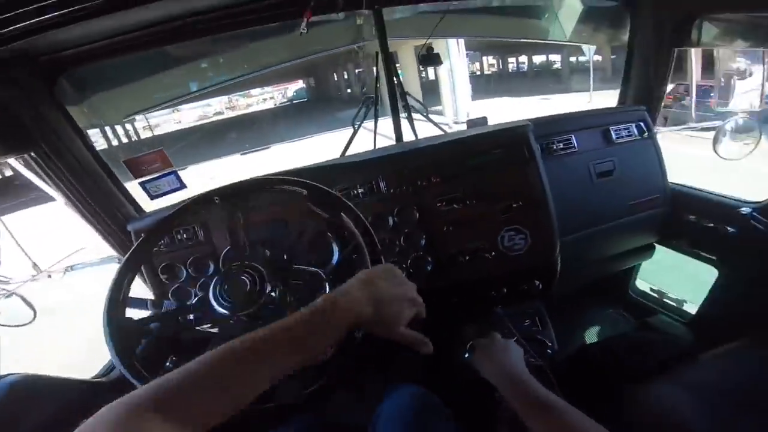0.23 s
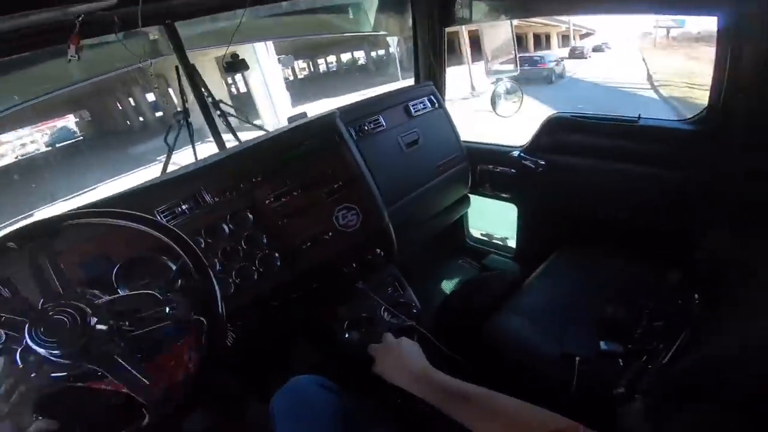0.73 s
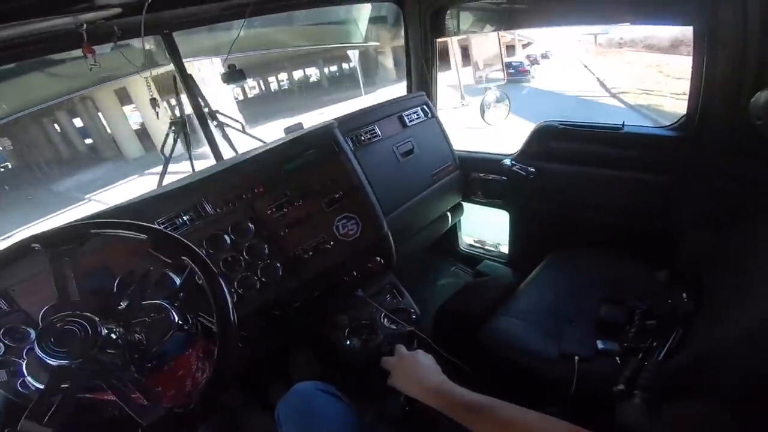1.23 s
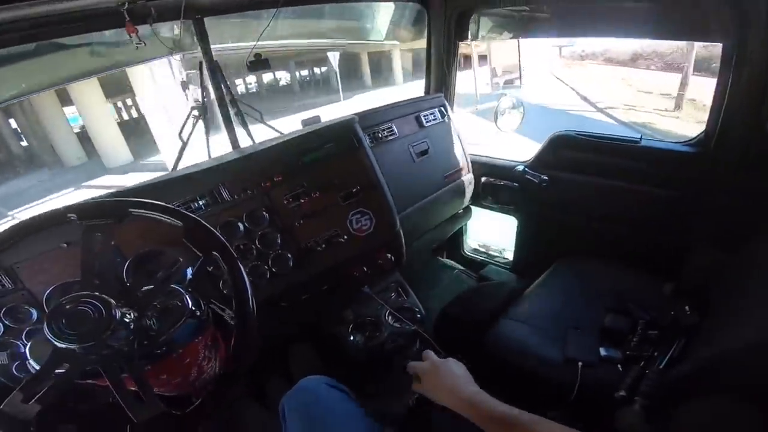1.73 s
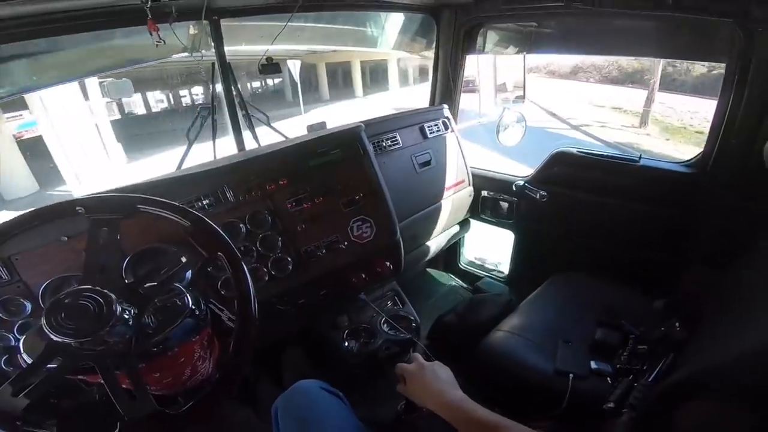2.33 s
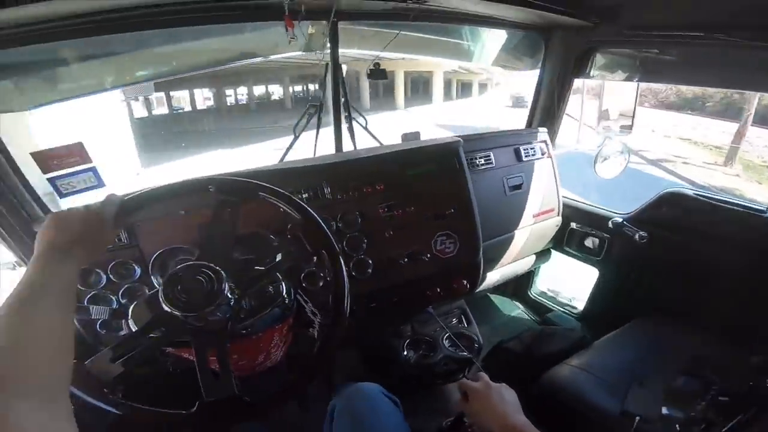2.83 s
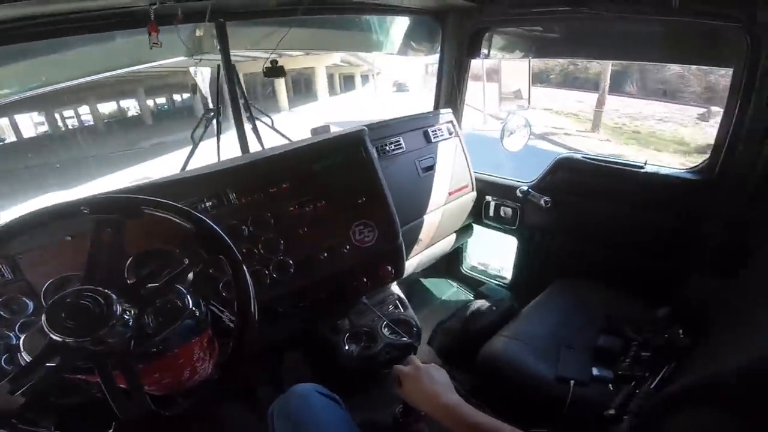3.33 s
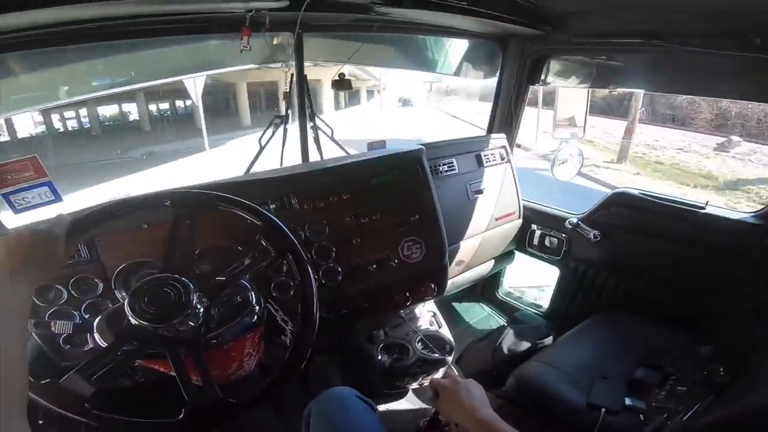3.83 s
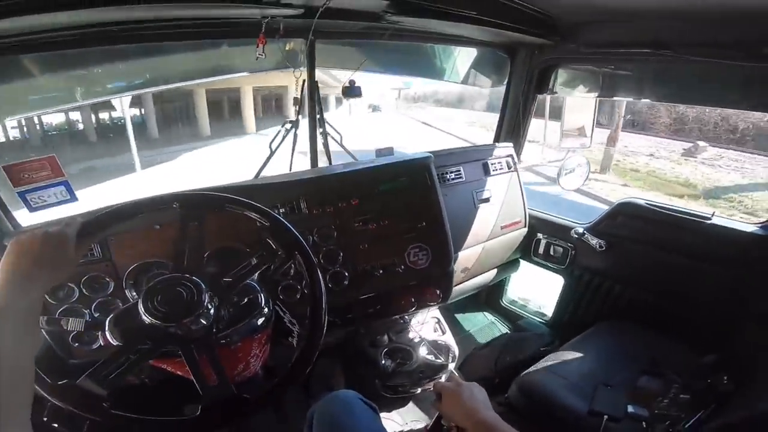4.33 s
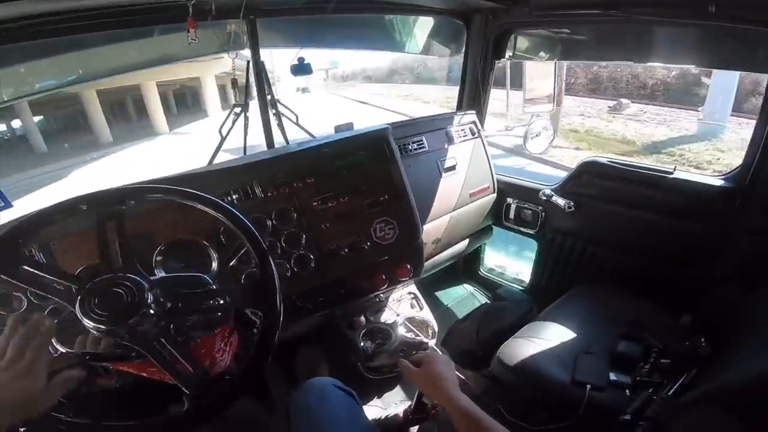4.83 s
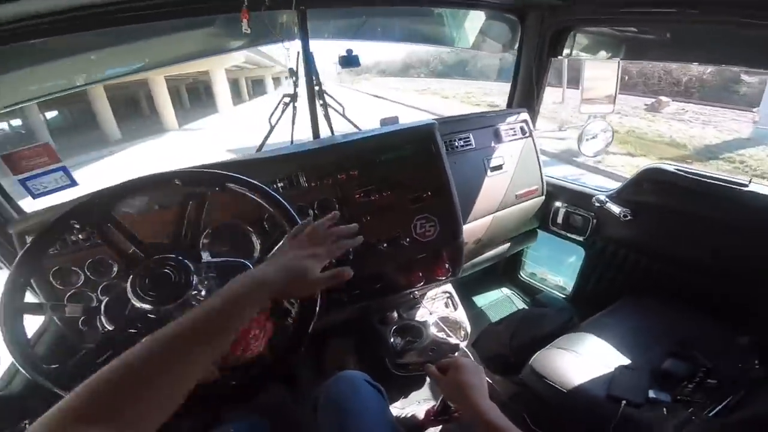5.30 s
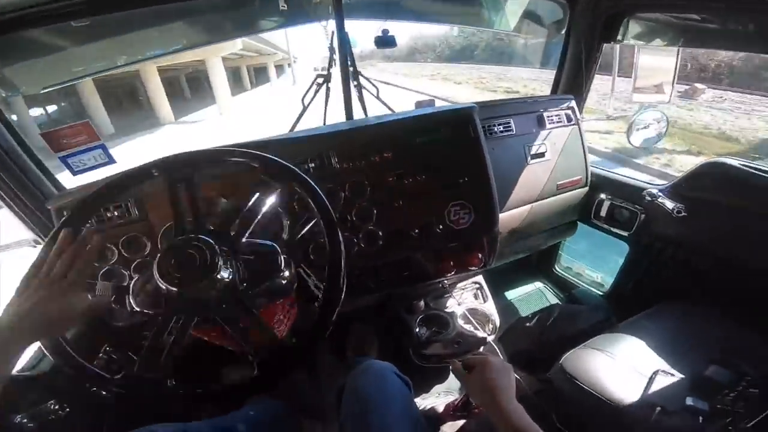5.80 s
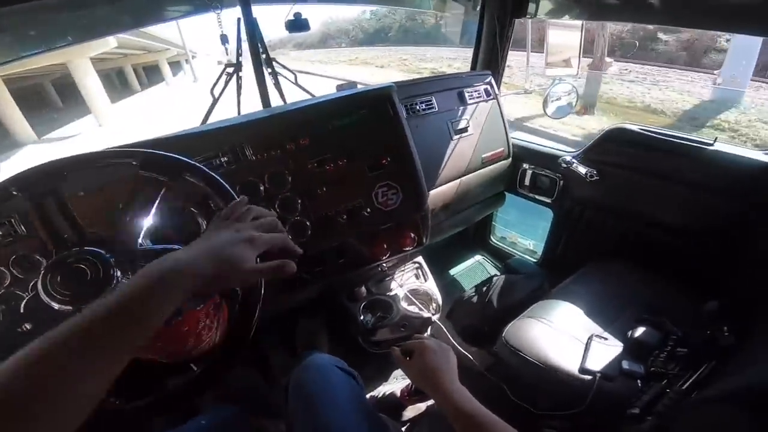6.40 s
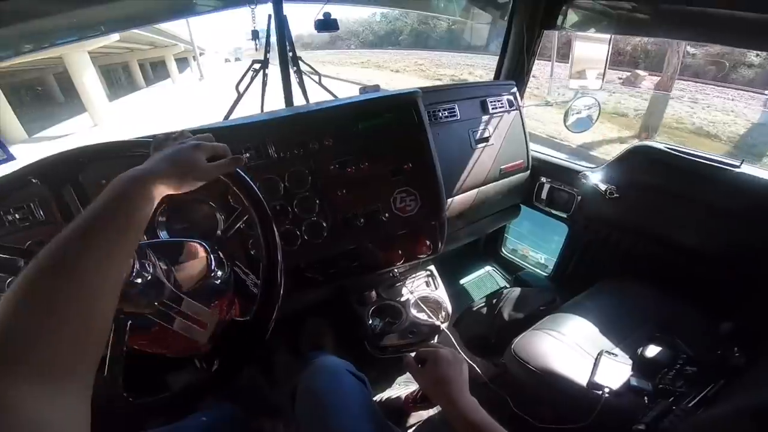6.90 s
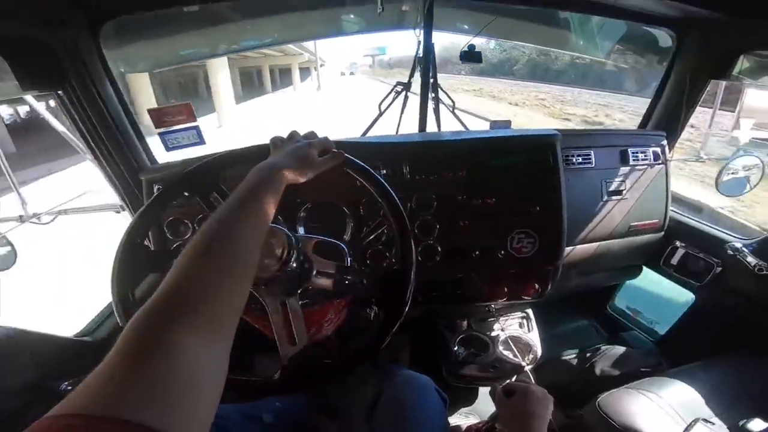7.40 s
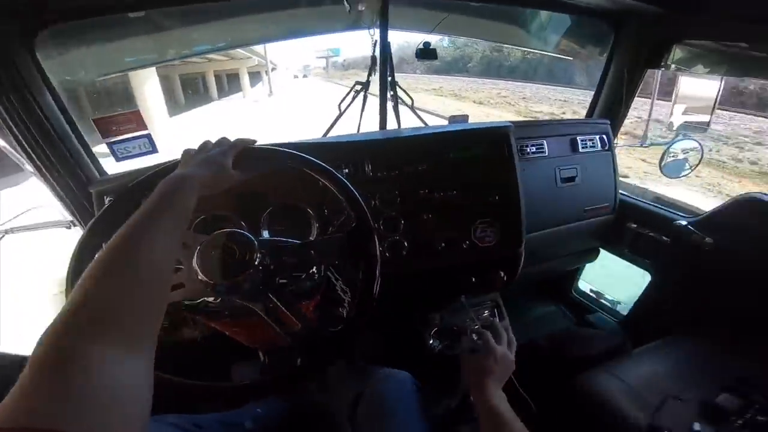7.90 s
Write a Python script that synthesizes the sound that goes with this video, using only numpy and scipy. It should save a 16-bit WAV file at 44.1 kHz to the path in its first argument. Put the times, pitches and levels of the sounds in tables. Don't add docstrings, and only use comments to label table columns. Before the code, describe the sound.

Close inside a closed truck cab, a six-cylinder diesel booms low and steady over clatter and road rumble. It drops in pitch at an early gear shift with air puffs, shifts again soon after, then pulls slowly upward while loose trim buzzes and a breathy turbo whistle climbs. At the end the pedal lifts, air vents and the pitch falls. The treble is dull, from a small camera microphone.

```python
import sys
import numpy as np
from scipy import signal
from scipy.fft import rfft, irfft, next_fast_len
from scipy.io import wavfile
from scipy.ndimage import uniform_filter1d

SR = 44100
rng = np.random.default_rng(int(sys.argv[2]) if len(sys.argv) > 2 else 0)


def field_ratio(decibels):
    return 10 ** (np.asarray(decibels, dtype=float) / 20)


def waveform_to_disk(signal):
    frames = np.transpose(np.atleast_2d(signal))
    scaled = np.clip(frames, -1, 1) * 32767
    samples = np.round(scaled).astype(np.int16)
    wavfile.write(sys.argv[1], SR, samples)


N = 359415

# [time_s, firings_per_s]
ENGINE = [(0.0, 62), (0.4, 63.5), (0.79, 50), (1.05, 51.3), (1.4, 53.3), (1.72, 60.6), (1.98, 52.4),
          (2.4, 56.2), (2.9, 56.6), (4.1, 55), (4.8, 57), (5.5, 62), (6.2, 66.3), (6.65, 70.3),
          (7.75, 77.1), (7.89, 75), (8.02, 55), (8.15, 50)]
# [time_s, clatter_db]
EFFORT = [(0.0, -32), (0.7, -35.5), (0.86, -34), (1.25, -35), (1.63, -31.5), (1.79, -35.5), (4.52, -32.5),
          (5.54, -29.5), (6.49, -33.5), (6.99, -32), (7.81, -31.5), (7.9, -33), (8.15, -29)]
# [time_s, whistle_hz, level_db]
TURBO = [(0, 3980, -66), (.6, 3770, -58), (1.0, 3490, -68), (1.95, 3600, -56), (2.2, 3600, -68),
         (4.5, 3650, -62), (5.3, 4150, -53.5), (5.8, 4500, -54), (6.35, 4600, -58), (6.7, 5450, -57),
         (7.15, 6050, -53.5), (7.55, 6350, -51), (7.9, 6250, -53), (8.0, 5950, -51), (8.15, 5750, -51.5)]
# [freq_hz, level_db_per_hz]
RUMBLE = [(12, -60.5), (20, -51.5), (45, -52.5), (75, -45.5), (110, -47), (140, -48.5), (200, -58),
          (240, -56.5), (285, -64), (380, -59.5), (480, -85), (560, -70.5), (800, -85.5)]
# [freq_hz, level_db_per_hz]
CLATTER = [(250, -60.5), (400, -63.5), (480, -65), (560, -63), (760, -67.5), (1150, -64.5), (1400, -70),
           (2300, -78), (3700, -84.5), (3950, -96.5), (6000, -110)]


def evened(x):
    return x / np.sqrt(np.mean(x ** 2) + 1e-20)


def read(points, hz):
    f, value = np.transpose(points)
    return np.interp(np.log(hz + 1), np.log(f + 1), value)


def curves(rows, t):
    s, *columns = np.transpose(rows)
    return [np.interp(t, s, c) for c in columns]


def drift(t, top_hz, count):
    hz = np.geomspace(top_hz / 10, top_hz, 12)[:, None]
    rows = []
    for phase in rng.random((count, 12)):
        sines = np.sin(2 * np.pi * (hz * t + phase[:, None]))
        rows.append(evened(np.sum(sines / np.sqrt(hz), 0)))
    return np.array(rows)


def resonate(x, hz, width):
    turn = np.exp(2j * np.pi * np.cumsum(hz * np.ones(x.shape[-1])) / SR)
    r = np.exp(-np.pi * width / SR)
    return 2 * (turn * signal.lfilter([(1 - r) ** 2], [1, -2 * r, r * r], x / turn)).real


def peaks_db(modes, hz):
    return sum(db / (1 + (2 * (hz - f) / w) ** 2) for f, w, db in modes)


def passed(points, hz):
    # [freq_hz, width_hz, gain_db]
    sheet_modes = [(235.6, 17, 7), (530.6, 11, 11.5), (632, 30, 6.5), (695, 73, 6.5), (871, 27, 9),
                   (993, 24, 5), (1660, 38, 4.5), (1920, 170, 4), (3020, 190, 4.5), (3560, 77, 1),
                   (9800, 400, 5)]
    return field_ratio(read(points, hz) + peaks_db(sheet_modes, hz))


def lifted(t):
    # [start_s, length_s, firing_tone_change_db]
    lifts = [
        (-.2, 0.258, 1),
        (0.376, .46, -7.5),
        (1.786, 0.19, -9),
        (7.85, .14, -4),
        (7.974, .4, -16),
    ]
    ramp_s, full_lift_db = .05, -9
    drop_db = 0
    for s, length, db in lifts:
        inside_s = np.minimum(t - s, s + length - t)
        drop_db = drop_db + db * np.clip(inside_s / ramp_s + .5, 0, 1)
    return np.clip(drop_db / full_lift_db, 0, 1) ** 2, drop_db


def efforts(t):
    clatter_db = curves(EFFORT, t)[0]
    slack_db = 2.5 * lifted(t)[0]
    rumble_db = -5 + slack_db - .05 * (curves(ENGINE, t)[0] - 56)
    hiss_db = -3 + 5 * np.log2(curves(TURBO, t)[0] / 3600)
    return clatter_db, rumble_db, hiss_db


def panels():
    # [freq_hz, level_db_per_hz]
    hiss = [(2500, -100), (4000, -96), (6300, -93.5), (8000, -95), (10000, -96.5), (11000, -100),
            (15000, -100), (16000, -120)]
    # [freq_hz, likeness]
    likeness = [(60, 1.0), (110, 0.76), (200, 1.0), (360, 0.93), (660, 0.95), (1200, 0.35), (2190, 0.54),
                (3990, 0.84), (8000, 0.081)]
    # [freq_hz, left_db]
    port_db = [(60, 6.0), (96, -2.5), (150, 3.5), (240, -1.0), (390, 1.0), (620, -0.5), (980, 5.5),
               (1570, 2.0), (2500, 1.0), (3990, 0.0), (8000, 1.1)]
    # [freq_hz, lead_radians]
    port_lead = [(0, 0.13), (690, -0.13), (950, -1.1), (1980, -0.47), (4130, 0.72)]
    knock_share = 0.12
    frames, hz = N // 512 + 5, np.fft.rfftfreq(2048, 1 / SR)
    a, b, c, d, patches = rng.standard_normal((frames, 1025, 5)).T
    patches = evened(uniform_filter1d(uniform_filter1d(patches, 10, 0), 10, 1))
    clatter_db, rumble_db, hiss_db = efforts(np.arange(frames) * 512 / SR)

    same = np.clip(read(likeness, hz), 0, 1)[:, None]
    left = a + 1j * b
    right = same * left + np.sqrt(1 - same ** 2) * (c + 1j * d)
    port = field_ratio(read(port_db, hz) / 2) * np.exp(.5j * read(port_lead, hz))
    z = np.array([left, right]) * np.array([port, 1 / port])[:, :, None]
    z *= field_ratio(1.6 * patches) * np.sqrt(SR / 2048)

    bright_db = 1.32 * np.clip(np.log2(hz / 1000 + 1e-9), 0, 1)[:, None]
    low = passed(RUMBLE, hz)[:, None] * field_ratio(rumble_db - 5.5)
    low = low + passed(hiss, hz)[:, None] * field_ratio(clatter_db + 39 + hiss_db)
    mid = passed(CLATTER, hz)[:, None] * field_ratio(clatter_db + 34 + bright_db)
    spectra = np.array([z * low, z * mid])
    steady, clatter = signal.istft(spectra, nperseg=2048, noverlap=1536)[1][..., :N]

    turns = np.cumsum(curves(ENGINE, np.arange(N) / SR)[0]) / SR
    blow = field_ratio(2.5 * rng.standard_normal(1000))[turns.astype(int)]
    knock = signal.oaconvolve(blow * np.exp(-(turns % 1) / .3), np.hanning(150), "same")
    return steady + clatter * evened(1 - knock_share + knock_share * evened(knock))


def turbo():
    t = np.arange(N) / SR
    hz, db = curves(TURBO, t)
    air = rng.standard_normal((3, N))
    air = air[:2] + 0.65 * air[2]
    flutter = np.interp(t, t[::256], drift(t[::256], 13, count=1)[0])
    whistle = field_ratio(2.8 * flutter) * evened(resonate(air, hz * (1 + 0.014 * flutter), 230))
    whoosh = evened(resonate(air, 1.01 * hz, 1100))
    return field_ratio(db) * evened((.38 + .7 * lifted(t)[0]) * whistle + whoosh)


def valves():
    # [start_s, peak_db, t60_s, centre_hz, width_hz]
    puffs = [
        (.345, -39.5, 0.082, 5500, 5000),
        (0.345, -40, 0.1, 11000, 6000),
        (.42, -43, .16, 10300, 5000),
        (.635, -49, 0.074, 8500, 3000),
        (.678, -41, 0.11, 10000, 5008),
        (1.575, -49, .15, 8000, 5995),
        (3.09, -46.5, .03, 1183, 1490),
        (7.957, -38.5, 0.099, 9003, 7000),
        (7.957, -42.5, 0.84, 3095, 2500),
    ]
    out, t = np.zeros((2, N + SR)), np.arange(8000) / SR
    for s, db, t60, hz, width in puffs:
        air = rng.standard_normal((3, len(t)))
        fade_db = -60 * np.maximum(t - .008, 0) / t60
        puff = evened(resonate(air[:2] + air[2], hz, width))
        puff *= np.minimum(t / 0.0018, 1) * field_ratio(db + fade_db)
        start = round(s * SR)
        out[:, start:start + len(t)] += puff
    return out[:, :N]


def trim():
    # [centre_s, length_s, freq_hz, level_db]
    buzzes = [(0.504, 0.54, 2560, -48.5), (0.852, .3, 1340, -43), (1.023, .026, 1626, -35),
              (1.061, 0.021, 1690, -35), (1.134, 0.045, 1630, -38), (1.214, 0.039, 1720, -37),
              (1.567, .25, 1940, -45), (2.116, .3, 1710, -46), (2.802, 0.77, 1660, -47.5),
              (3.3, 0.92, 1513, -50), (4.072, .25, 1634, -40.5), (4.304, 0.11, 1746, -37.5),
              (4.704, 0.65, 2010, -45.5), (5.058, 0.37, 1927, -38.5), (5.353, 0.76, 3130, -49),
              (5.393, 1.2, 635, -45), (6.151, 1.1, 1870, -43.5), (6.854, 0.74, 1910, -49),
              (6.85, 1.05, 2210, -45.5), (4.8, .5, 2230, -43), (6.8, 0.85, 2000, -46),
              (7.401, 2.2, 1233, -45.5), (7.6, 1.1, 1795, -44.5), (8.023, 0.24, 2650, -53),
              (7.9, 0.7, 116, -22.5), (.2, 0.62, 1904, -45), (5.6, 1., 204.5, -28), (7.202, 1.8, 632, -36),
              (7.0, 1.6, 842, -45.5), (3.2, 3.0, 717, -49)]
    # [freq_hz, width_hz]
    buzz_width = [(117, 20), (213, 24), (640, 26), (700, 55), (1400, 42), (2000, 150), (3000, 330)]
    # [freq_hz, left_over_right_db]
    buzz_left = [(200, -1.5), (700, 0.5), (1650, 6), (2000, 2.5), (2600, -2)]
    out = np.zeros((2, N + 2 * SR))
    t = np.arange(0, N / SR + 2, .005)
    shakes = np.interp(np.arange(N + 2 * SR) / SR, t, field_ratio(2.2 * drift(t, 25, count=1)[0]))
    for s, length, hz, db in buzzes:
        width, left_db = read(buzz_width, hz), read(buzz_left, hz)
        size, start = round(length * SR), max(round((s - length / 2) * SR), 0)
        air = rng.standard_normal((3, size))
        air = air[2] + np.clip(hz / 2000, 0, 1) * air[:2]
        buzz = evened(resonate(air, hz, width) * shakes[start:start + size])
        level = field_ratio(db + np.array([[left_db], [-left_db]]) / 2)
        out[:, start:start + size] += level * buzz * np.hanning(size)
    return out[:, :N]


def firing():
    multiple_db = [-18, -23, -30.5, -38]
    lift_share = [0.73, 0.32, 0.32, 0.15]
    stumble_db = [-2.5, -6.5, -8, -6]
    # [freq_hz, width_hz, gain_db]
    boom = [(56.7, 5, -4), (66.5, 17.7, 6), (76, 14, 1.5), (103.4, 5.5, 2), (110.7, 11, 6.5),
            (121.9, 5.6, -4), (153, 3.9, -4), (173.9, 21.7, 9.5), (197.7, 19, -9.5), (220.3, 15, 6.5),
            (262, 9.8, -0.5)]
    # [firings_per_s, second_radians, third_radians, fourth_radians]
    phase_turns = [(53, -2.3, 1.2, 0), (55.3, -1.9, 2.2, .7), (57, -2.4, 1.5, -.6), (60, -2.9, .9, -1.2),
                   (62.8, -1.8, -.3, -3.3), (65.5, -1.4, -1.1, -3.3), (70, 0, .4, -1.2), (77, 1.6, 2.2, 2)]
    uneven = [(1, -8.5), (2, 0.5), (3, -13), (4, -3.5), (5, -7), (7, -6.5), (8, -11), (9, -2.5), (10, -6.5),
              (11, -0.5), (13, -2), (14, -18.5), (15, 0.5), (16, -4), (17, -3.5), (19, -4), (20, 3.5),
              (21, 3), (22, -2.5), (23, -9)]
    stride = 16
    t = np.arange(N // stride + 1) * stride / SR
    hz = curves(ENGINE, t)[0]
    off, drop_db = lifted(t)
    clatter_db, rumble_db, _ = efforts(t)
    cycle_hz = hz / 6
    cycle = 2 * np.pi * np.cumsum(cycle_hz) * stride / SR

    slip = [0, *curves(phase_turns, hz)]
    load_db = 0.14 * (clatter_db + 33)
    waver_db = np.array([[.8], [1.3], [.7], [1.3]]) * np.minimum(drift(t, 22, count=4), .9)
    misses_db = np.c_[stumble_db] * off * np.maximum(drift(t, 30, count=4), 0)
    wobble = field_ratio(waver_db + misses_db)
    out = 0
    for k in range(4):
        boom_db = peaks_db(boom, (k + 1) * hz)
        db = multiple_db[k] + lift_share[k] * drop_db + load_db + boom_db
        out = out + np.sqrt(2) * field_ratio(db) * wobble[k] * np.cos((k + 1) * 6 * cycle + slip[k])

    wander, start = field_ratio(2 * drift(t, 3, count=92)), 2 * np.pi * rng.random(92)
    for k, (order, db) in enumerate(uneven):
        level = field_ratio(21 + db + rumble_db) * passed(RUMBLE, order * cycle_hz) * wander[k]
        out += level * np.cos(order * cycle + start[k])
    out = out * field_ratio([[.05], [-.05]])
    apart = rng.standard_normal(92) * [[1], [-1]]
    for k, order in enumerate(range(25, 97), len(uneven)):
        through = passed(RUMBLE, order * cycle_hz) + passed(CLATTER, order * cycle_hz)
        third_db = 3.0 * (order % 3 == 0)
        level = field_ratio(10.5 + clatter_db + 28 + third_db) * through * wander[k]
        spread = order / 130 * apart[:, [k]]
        out += level * np.cos(order * cycle + start[k] + spread)
    return signal.resample_poly(out, stride, 1, axis=1, window=("kaiser", 10))[:, :N]


def scene():
    return firing() + panels() + trim() + turbo() + valves()


def roll_off(x):
    return signal.sosfilt(signal.butter(12, 14550, fs=SR, output="sos"), x)


def record(dry):
    # [freq_hz, gain_db]
    housing = [(4000, -1), (6300, -5.5), (8000, -11), (10000, -18.5), (11200, -26), (15000, -36.5)]
    ceiling, bias = 0.61, .0018
    size = next_fast_len(N)
    shell = field_ratio(read(housing, np.fft.rfftfreq(size, 1 / SR)))
    dulled = irfft(rfft(dry, size) * shell, size)[:, :N]
    limited = dulled / (1 + (dulled / ceiling) ** 6) ** (1 / 6)
    return roll_off(limited + bias)


dry = scene()
out = record(dry)
waveform_to_disk(out)
```